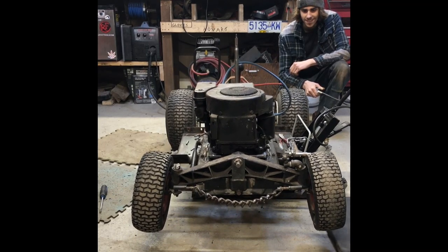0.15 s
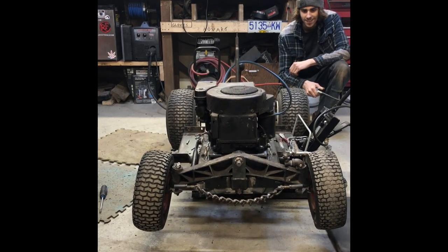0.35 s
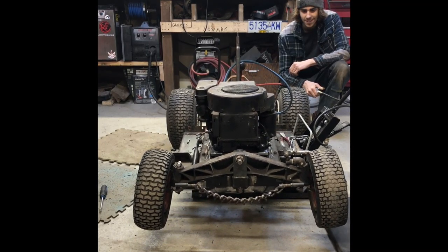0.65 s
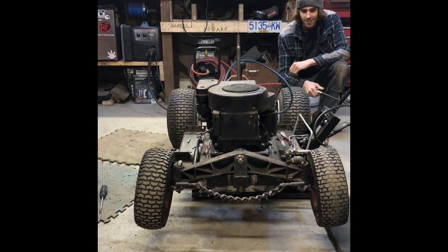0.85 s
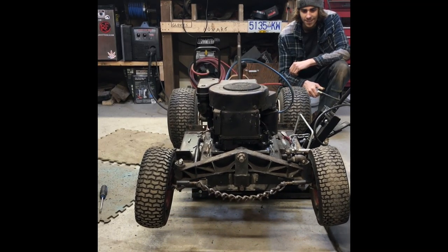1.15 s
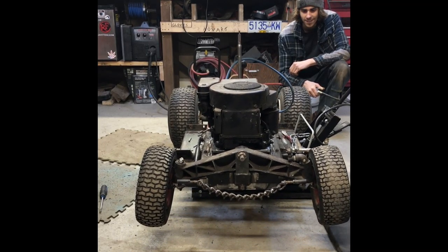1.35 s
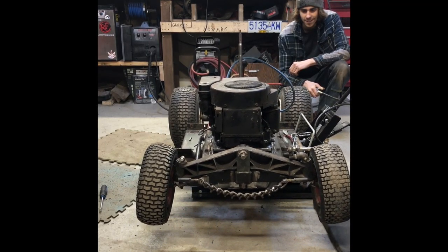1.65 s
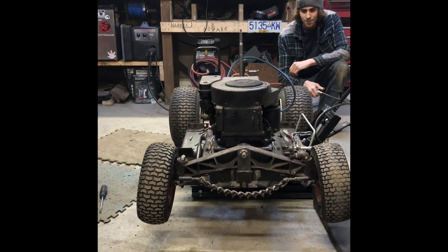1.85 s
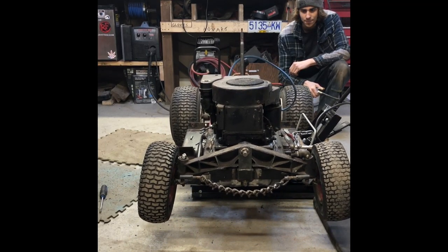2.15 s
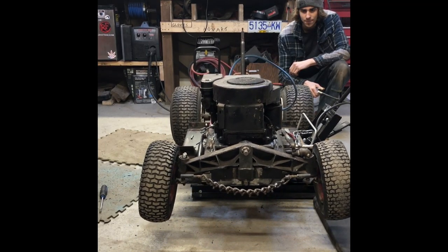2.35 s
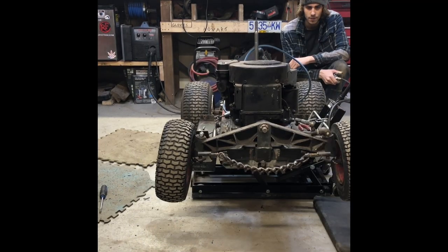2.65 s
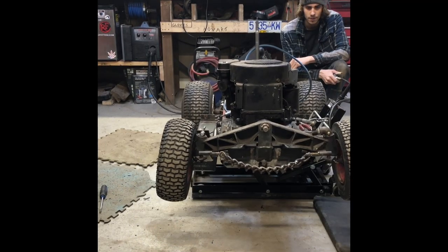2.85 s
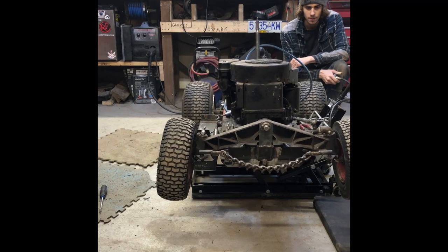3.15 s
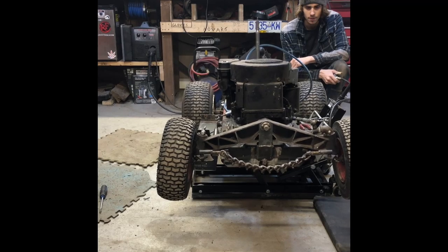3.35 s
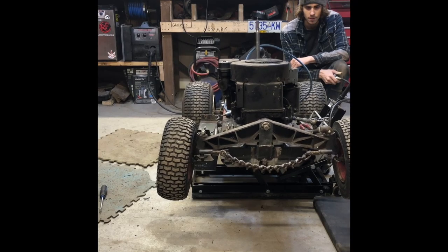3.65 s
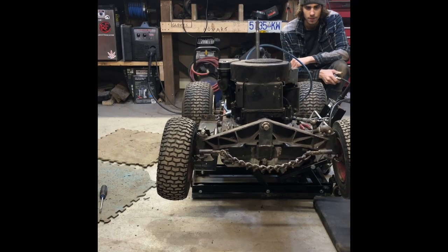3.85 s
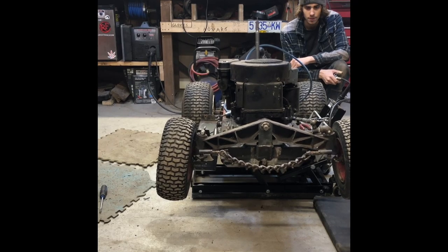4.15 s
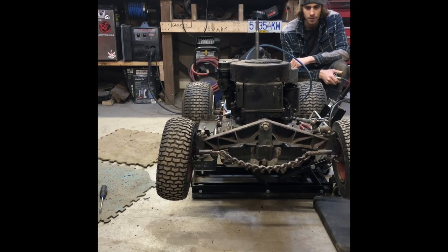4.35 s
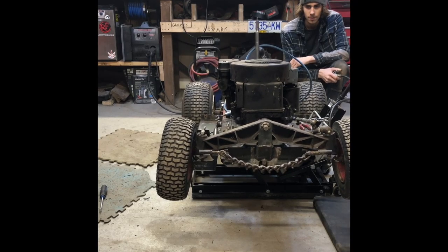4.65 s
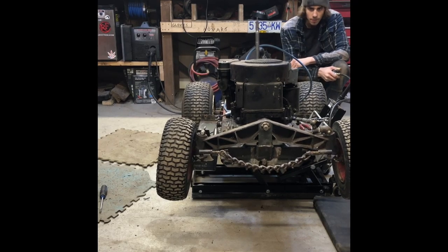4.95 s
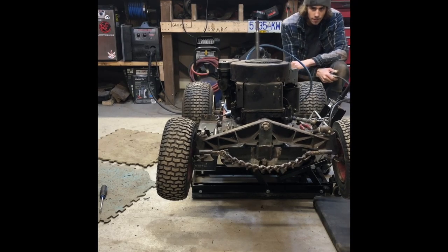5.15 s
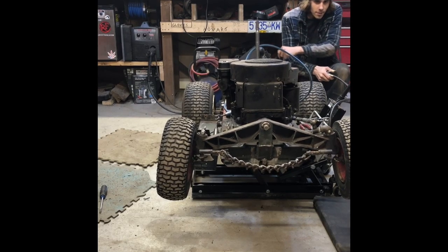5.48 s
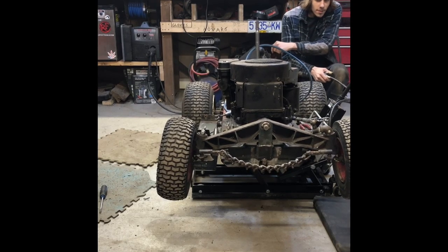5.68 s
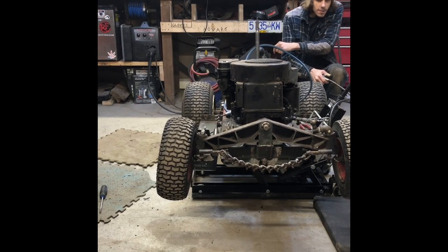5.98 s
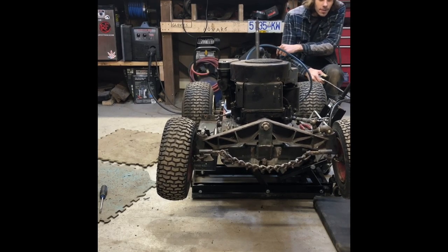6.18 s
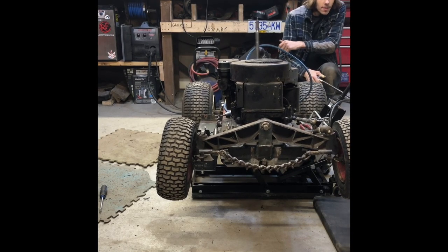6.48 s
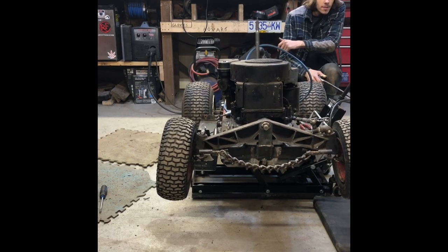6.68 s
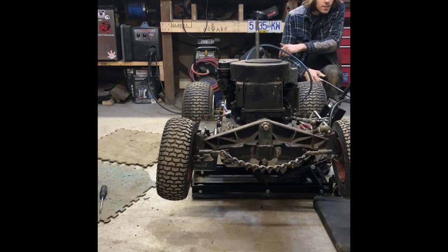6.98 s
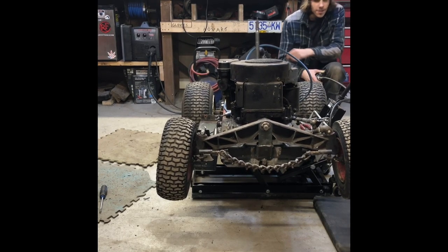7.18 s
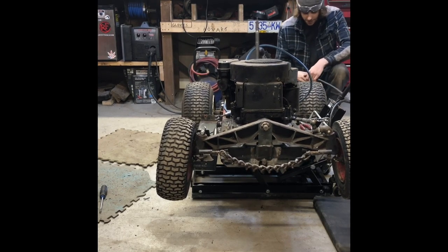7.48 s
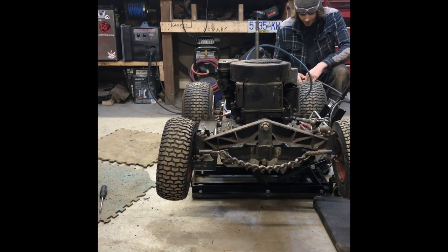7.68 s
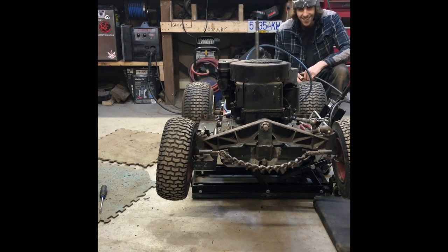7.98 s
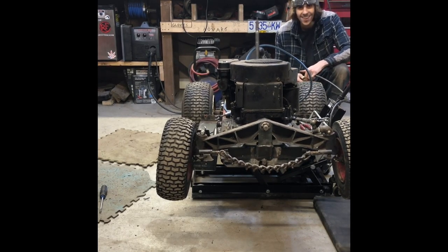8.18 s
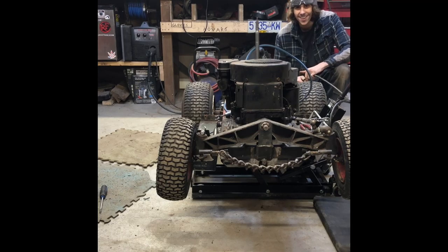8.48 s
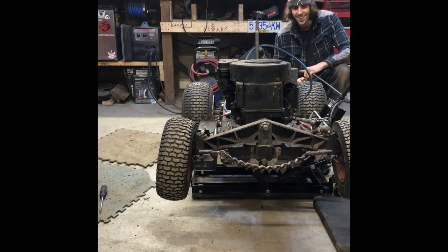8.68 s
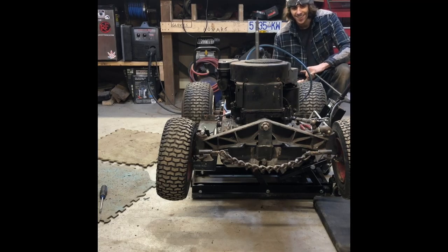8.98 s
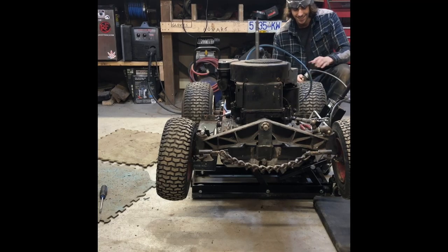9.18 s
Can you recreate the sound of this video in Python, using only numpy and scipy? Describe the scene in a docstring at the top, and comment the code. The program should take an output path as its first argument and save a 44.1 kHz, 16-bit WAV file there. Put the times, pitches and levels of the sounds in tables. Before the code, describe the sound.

In a garage with a short echo and a soft steady whirr, a pneumatic lift pump chugs quickly, spitting air and knocking with every stroke. It stops, then runs twice more, first briefly and then longer, each time starting with a valve hiss and squeak and joined by a faint hum. Afterwards the valve lets off a few short puffs and squeaks, with a small metal clink and a low thud.

```python
"""Over a soft whirr in a garage, an air-driven hydraulic pump raises a lift in three runs of about ten
strokes a second. Every stroke dumps its air with a thump, a bright jet and a hollow rush from the
housing; then the piston knocks back. A short silence cuts off the first run. The air valve hisses and
squeaks as it opens for the next two, and a faint hum joins in. At the end the valve lets off a few
last puffs and squeaks, with a clink of the hose fitting and two low thuds."""
import sys
import numpy as np
from scipy import signal
from scipy.fft import rfft, irfft, next_fast_len
from scipy.io import wavfile
from scipy.ndimage import uniform_filter1d

SR = 44100
rng = np.random.default_rng(int(sys.argv[2]) if len(sys.argv) > 2 else 0)


def generate_wav(sig):
    """Save sig (samples, or channels by samples) to the path in sys.argv[1] as 16-bit PCM at SR."""
    pcm = np.round(np.clip(np.atleast_2d(sig).T, -1, 1) * 32767).astype(np.int16)
    wavfile.write(sys.argv[1], SR, pcm)


N = 411453
TIME = np.arange(N) / SR


def from_db(db):
    """Turn decibels into a number to multiply by."""
    return 10 ** (np.asarray(db) / 20)


def rms_one(x):
    """Scale a sound so that its average strength (rms) is 1."""
    return x / np.sqrt(np.mean(x ** 2) + 1e-20)


def at_hz(points, hz):
    """Read between the rows of a table, giving each octave equal room."""
    known_hz, values = np.transpose(points)
    return np.interp(np.log(hz + 1e-3), np.log(known_hz), values)


def noise(colour, peaks=()):
    """Noise shaped by colour rows (pitch_hz, gain_db) and peaks (pitch_hz, width_hz, gain_db)."""
    size = next_fast_len(N)
    hz = np.arange(size // 2 + 1) * SR / size
    peaks_db = sum(top / (1 + (2 * (hz - centre) / width) ** 2) for centre, width, top in peaks)
    white = rfft(rng.standard_normal(size))
    return rms_one(irfft(white * from_db(at_hz(colour, hz) + peaks_db), size)[:N])


def ring(x, hz, ring_s):
    """Each click in x starts a tone that fades by 60 dB in ring_s."""
    fade, turn = from_db(-60 / (ring_s * SR)), 2 * np.pi * hz / SR
    return signal.lfilter([0, np.sin(turn)], [1, -2 * fade * np.cos(turn), fade * fade], x + 1e-18)


def wavering_tone(hz, ring_s):
    """Noise narrowed twice around one pitch becomes an unsteady tone."""
    return rms_one(ring(ring(rng.standard_normal(N), hz, ring_s), hz, ring_s))


def steady_tone(hz, width_hz):
    """A tone of even loudness whose pitch wanders a little."""
    wander = np.cumsum(rng.standard_normal(N)) * np.sqrt(2 * np.pi * width_hz / SR)
    return np.sqrt(2) * np.sin(2 * np.pi * hz * TIME + uniform_filter1d(wander, size=1000))


def dull(x, top_hz):
    """Soften the treble above top_hz."""
    return signal.sosfilt(signal.butter(2, top_hz, fs=SR, output="sos"), x)


def burst(age, rise_s, hold_s, decay_s):
    """A loudness curve that rises, holds until the age hold_s, then dies away."""
    return np.clip(age / rise_s, 0, 1) * np.exp(-np.maximum(age - hold_s, 0) / decay_s)


def swing(age, width_s):
    """One swing of air pressure, down then up."""
    return age / width_s * np.exp(.5 - .5 * (age / width_s) ** 2)


def repeat(clicks, shape):
    """Play one shape at every click."""
    return signal.oaconvolve(clicks, shape)[:N]


def garage(x, echo_db, build_s):
    """The direct sound plus the room's wash of echoes, which dies sooner in the treble."""
    # how long the echoes take to fade by 60 dB: pitch_hz, ring_s
    echo_times = [(60, 0.42), (300, 0.64), (1400, 0.53), (4000, 0.53), (8000, 0.37), (15000, 0.2)]
    age, hz = TIME[:SR], np.arange(SR // 2 + 1.)
    white = rfft(rng.standard_normal(SR))
    centres = np.geomspace(60, 15360, 9)
    tail = 0
    for centre, share in zip(centres, np.eye(len(centres))):
        band = irfft(white * at_hz(np.c_[centres, share], hz), SR)
        fade = from_db(-60 * age / at_hz(echo_times, centre)) * (1 - np.exp(-age / build_s))
        tail = tail + band * fade / np.sqrt(np.sum(fade ** 2))
    echo_gain = from_db(echo_db)
    return (x + echo_gain * repeat(x, tail)) / np.sqrt(1 + echo_gain ** 2)


def background():
    """A soft machine-like whirr fills the room, with a few faint tones."""
    # colour of the whirr: pitch_hz, gain_db
    colour = [(15, -32), (25, 0), (70, -14), (145, -9), (255, -10.5), (334, -4), (488, -6), (543, -15.5),
              (605, -9), (984, -14), (1290, -10.5), (1930, -25.5), (2100, -20.5), (6880, -34.5),
              (15900, -45)]
    # its peaks and one dip: pitch_hz, width_hz, gain_db
    peaks = [(399, 110, -3.5), (715, 85, 1.5), (1444, 180, 7.5), (1920, 250, 4), (2237, 200, 2.5),
             (4050, 700, 4.5)]
    # steady tones: pitch_hz, level_db
    tones = [(294, -70), (388, -70), (614, -70), (714, -72)]
    whirr = from_db(-55) * rms_one(garage(noise(colour, peaks), echo_db=-8, build_s=0.0062))
    return whirr + sum(from_db(db) * steady_tone(hz, width_hz=4.7) for hz, db in tones)


def strokes(jitter_s, uneven_db):
    """A click each time the exhaust port opens, in four rows: jet, rush, opening and landing."""
    # pump runs: first_stroke_s, last_stroke_s, first_gap_s
    runs = [ (0.006, 2.3605, .0935), (2.822, 3.814, .0994), (4.958, 6.988, .0991), ]
    # click strength in each run: jet_db, rush_db, opening_db, landing_db
    efforts = [(-1.16, 0.1, -35, -44.5), (-2.8, -2.5, -37, -36), (-3.5, -2.5, -39, -36)]
    clicks = np.zeros((4, N))
    for (first, last, gap), effort_db in zip(runs, efforts):
        count = round((last - first) / gap)
        stroke = np.arange(count + 1)
        drift_s = last - first - count * gap   # the two long runs slow down as the load grows
        times = first + stroke * gap + drift_s * (stroke / count) ** 2
        time_chance, level_chance = rng.standard_normal((count + 1, 2)).T
        samples = np.abs((times + jitter_s * time_chance) * SR).astype(int)
        clicks[:, samples] = from_db(np.c_[list(effort_db)] + uneven_db * level_chance)
    return clicks


def piston_thumps(opening, landing, lowest_hz):
    """The air is shoved as the port opens and as the piston lands; the small pump gives no deep bass."""
    lead = SR // 50   # room for the first half of each swing
    age = TIME[:SR // 8] - lead / SR
    shoves = repeat(opening, swing(age - 0.0037, width_s=0.0033))
    landings = repeat(landing, swing(age - 0.0439, width_s=0.0017))
    bass_cut = signal.butter(2, lowest_hz, "high", fs=SR, output="sos")
    return signal.sosfilt(bass_cut, np.roll(shoves + landings, -lead))


def exhaust(jet_clicks, rush_clicks, swirls):
    """The jet leaves the port at once, the housing rushes later; each swirl of air has its own echoes."""
    # colour of the bright jet: pitch_hz, gain_db
    jet_colour = [(1820, -27.5), (3100, -14), (4190, -5), (4770, -5), (6100, -0.5), (11100, 1.5),
                  (15100, -2), (15900, -9.5)]
    # colour of the hollow rush in the housing: pitch_hz, gain_db
    rush_colour = [(30, -26.5), (60, -22), (120, -15), (170, -13), (210, -8.5), (330, -8), (700, -3.5),
                   (1140, -4), (1400, -4), (2000, -7.5), (3000, -8.5), (4000, -6.5), (6000, -29),
                   (12000, -50)]
    age = TIME[:SR // 4]
    jet_flow = from_db(-13.5) * repeat(jet_clicks, burst(age, rise_s=0.007, hold_s=0.028, decay_s=0.016))
    rush_flow = from_db(-25.5) * repeat(rush_clicks, burst(age, 0.012, 0.048, 0.025))
    honk_flow = from_db(-30) * repeat(rush_clicks, burst(age, 0.044, 0.048, 0.01))
    out = 0
    for _ in range(swirls):
        jet = jet_flow * noise(jet_colour, peaks=[(4230, 270, 3.6), (11350, 140, 1.66)])
        rush = rush_flow * noise(rush_colour, peaks=[(665, 150, 0.91), (1420, 470, 1.5)])
        honk = honk_flow * wavering_tone(hz=1428, ring_s=0.0077)   # the hollow housing sounds along
        out = out + garage(jet + rush + honk, echo_db=0, build_s=0.008)
    return out / np.sqrt(swirls)


def thuds():
    """Each soft jolt of the valve or the lift rings one low note."""
    # jolts: start_s, pitch_hz, level_db, ring_s
    jolts = [(0.01, 39, -35, 0.66), (2.47, 115, -54, .6), (8.485, 152, -46.5, 0.22), (8.516, 116, -56, .55)]
    return sum(from_db(db) * ring(signal.unit_impulse(N, int(start * SR)), hz, ring_s)
               for start, hz, db, ring_s in jolts)


def body_knocks(clicks, delay_s):
    """The landing piston sets the pump body ringing."""
    # notes of the pump body and the lift: pitch_hz, gain_db, ring_s
    notes = [(54.1, -3, 0.52), (89, -13, .25), (120, -12.5, .2), (157, -4.5, 0.34), (212, -2, 0.226),
             (491, 4, 0.13), (724, -3.5, 0.088), (816, -4, 0.0815), (1015, 4.5, 0.085), (1220, -8, 0.075),
             (1450, 4.5, .07), (2290, 9.5, 0.061)]
    push = np.roll(clicks, int(delay_s * SR))
    return from_db(-41.5) * sum(ring(push, hz, ring_s) * from_db(db) for hz, db, ring_s in notes)


def dropout(depth_db, fade_out_s, fade_in_s):
    """A loudness curve that falls at once into a short near-silence, then fades back in."""
    # the quiet gap: start_s, end_s
    silence = (2.423, 2.454)
    start, end = silence
    going = np.exp(-np.maximum(TIME - start, 0) / fade_out_s)
    returning = 1 - np.exp(-np.maximum(TIME - end, 0) / fade_in_s)
    return np.maximum(going + returning, from_db(depth_db))


def narrow_gap(openings, top_hz, whistle_db, rise_s, close_s, ring_s):
    """Air forced through a narrow gap hisses and whistles, at one pitch for each opening."""
    # colour of the hiss: pitch_hz, gain_db
    colour = [(1000, -3), (2000, -1), (3200, -7), (4200, 1), (5000, -1), (8000, 0), (11000, 2.5),
              (16000, 0)]
    hiss = dull(noise(colour), top_hz)
    out = 0
    for start, end, db, hz in openings:
        flow = from_db(db) * burst(TIME - start, rise_s, end - start, close_s)
        out = out + flow * (hiss + from_db(whistle_db) * wavering_tone(hz, ring_s))
    return out


def valve_seeps():
    """Air seeps through the barely open valve: a thin, bright hiss over a weaker whistle."""
    # seeps: start_s, end_s, level_db, pitch_hz
    seeps = [(2.728, 2.825, -41, 8100), (4.886, 4.960, -43.5, 11000), (7.405, 7.450, -62, 7950),
             (7.58, 7.612, -56, 11400)]
    return narrow_gap(seeps, top_hz=12540, whistle_db=-7, rise_s=0.01, close_s=0.01, ring_s=0.002)


def valve_squeaks():
    """The valve squeaks as it opens wider: duller, with more tone."""
    # squeaks: start_s, end_s, level_db, pitch_hz
    squeaks = [(2.795, 2.815, -35, 1580), (4.936, 4.96, -34, 1580), (7.653, 7.70, -45, 1540),
               (8.369, 8.404, -45, 1670), (8.467, 8.51, -51, 1600)]
    return narrow_gap(squeaks, top_hz=5380, whistle_db=-4.5, rise_s=0.0054, close_s=0.007, ring_s=0.0051)


def hum():
    """A faint low hum swells and dies away around each of the two later runs."""
    # swells: start_s, end_s, level_db
    swells = [(2.8, 3.85, -57.5), (4.58, 7.35, -58.5)]
    loudness = sum(from_db(db) * burst(TIME - start, rise_s=0.54, hold_s=end - start, decay_s=0.18)
                   for start, end, db in swells)
    return loudness * steady_tone(hz=93, width_hz=3)


def valve_puffs(rise_s):
    """Trapped air escapes in short puffs that die as the pressure falls."""
    # puffs: start_s, level_db, decay_s, top_hz
    puffs = [(7.609, -44, 0.015, 15000), (8.509, -23.5, 0.014, 14500), (8.592, -33.5, .015, 3200)]
    # colour of the escaping air: pitch_hz, gain_db
    colour = [(40, -8), (70, 0), (130, -4), (220, 0), (370, -1), (600, -1.5), (800, -7), (1150, -4.5),
              (1760, 0), (2900, -6), (4200, -4.5), (7000, -5), (10000, -5.5), (15900, -13)]
    air = noise(colour, peaks=[(1890, 300, 2.4), (3680, 550, 3.5)])
    return sum(from_db(db) * burst(TIME - start, rise_s, rise_s, decay_s) * dull(air, top_hz)
               for start, db, decay_s, top_hz in puffs)


def valve(swirls):
    """All the valve's sounds together; each swirl of air takes its own paths through the room."""
    out = 0
    for _ in range(swirls):
        air = valve_seeps() + valve_squeaks() + valve_puffs(rise_s=0.0083)
        out = out + garage(air, echo_db=7, build_s=0.0066)
    return out / np.sqrt(swirls)


def hose_clink():
    """A light touch of metal on metal rings the hose fitting."""
    # touches: start_s, strength_db
    touches = [(7.611, -46)]
    # notes of the metal: pitch_hz, gain_db, ring_s
    notes = [(4170, -8, .1), (4200, -2, .12), (8800, 1, .05), (10980, -3, .08), (14800, -6, .1)]
    clicks = np.zeros(N)
    for start, db in touches:
        clicks[int(start * SR)] = from_db(db)
    return sum(ring(clicks, hz, ring_s) * from_db(db) for hz, db, ring_s in notes)


def scene():
    """Pump and valve sound in the garage, over its steady background."""
    jet, rush, opening, landing = strokes(jitter_s=0.00049, uneven_db=0.28)
    thumps = garage(piston_thumps(opening, landing, lowest_hz=54), echo_db=-5, build_s=0.0087)
    knocks = garage(body_knocks(rush, delay_s=0.039), echo_db=-1.5, build_s=0.0087)
    clink = garage(hose_clink(), echo_db=5, build_s=0.0069)
    pump = thumps + exhaust(jet, rush, swirls=6) + knocks
    return (pump + thuds() + valve(swirls=2) + clink + background() + hum())[None]


def record(dry):
    """The sound drops out for a moment, and the treble above 15900 Hz is cut."""
    treble_cut = signal.ellip(12, .1, 80, 15900, fs=SR, output="sos")
    return signal.sosfilt(treble_cut, dry * dropout(depth_db=-44, fade_out_s=0.0006, fade_in_s=0.052))


dry = scene()
out = record(dry)
generate_wav(out)
```